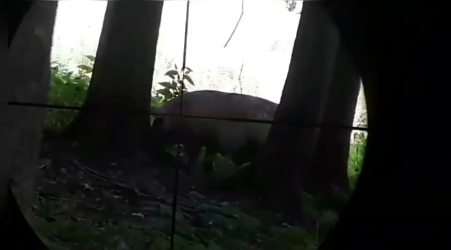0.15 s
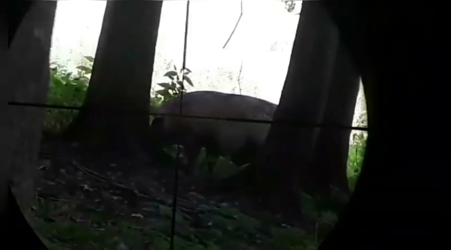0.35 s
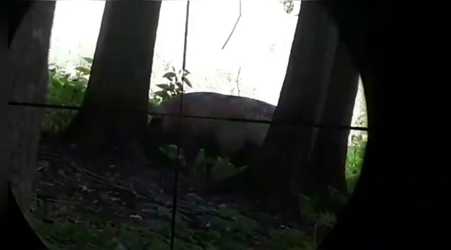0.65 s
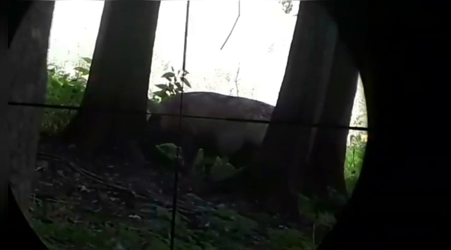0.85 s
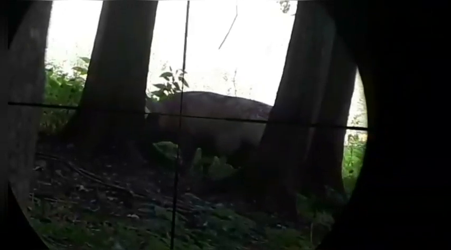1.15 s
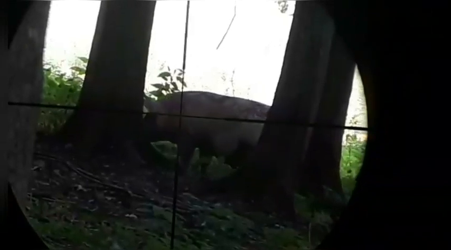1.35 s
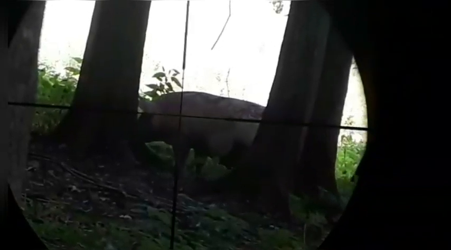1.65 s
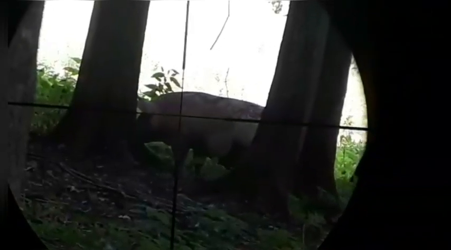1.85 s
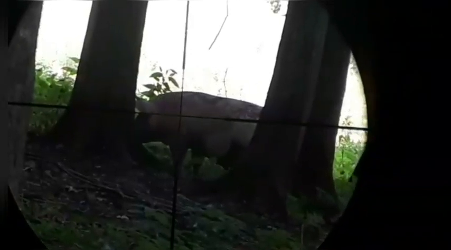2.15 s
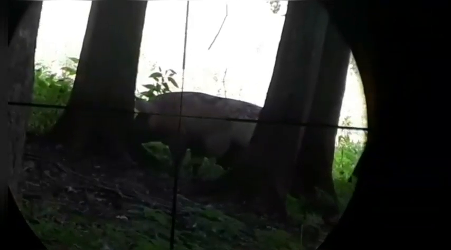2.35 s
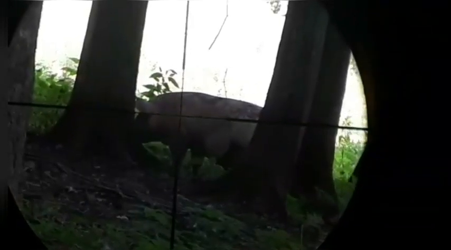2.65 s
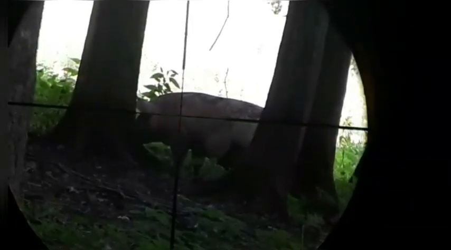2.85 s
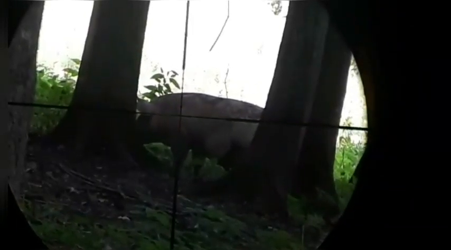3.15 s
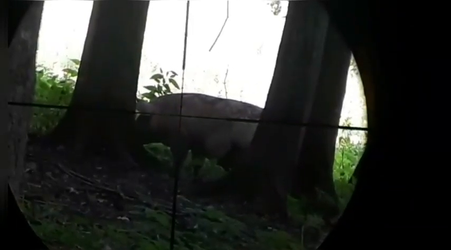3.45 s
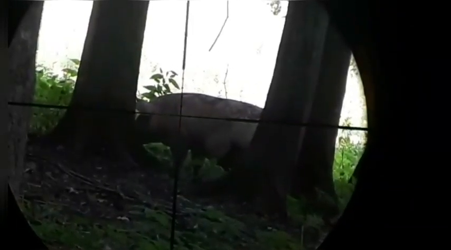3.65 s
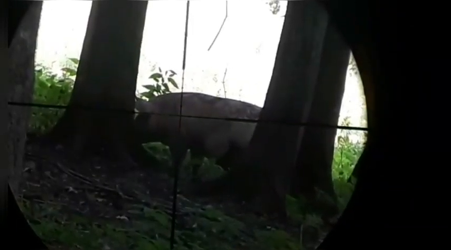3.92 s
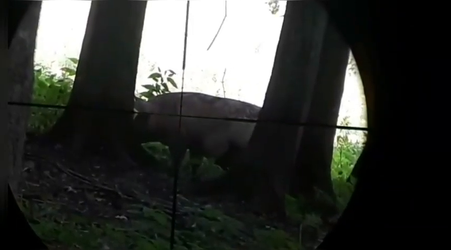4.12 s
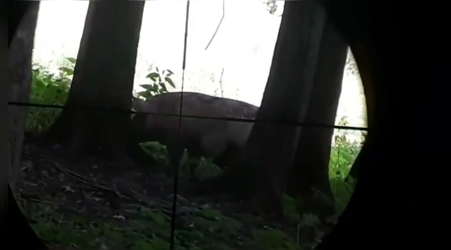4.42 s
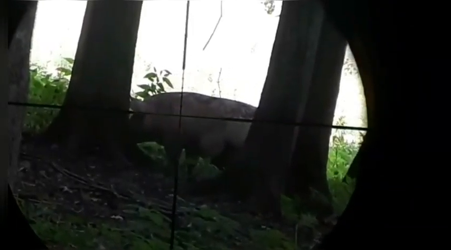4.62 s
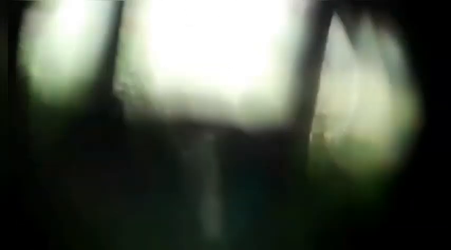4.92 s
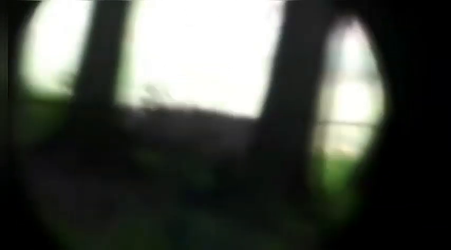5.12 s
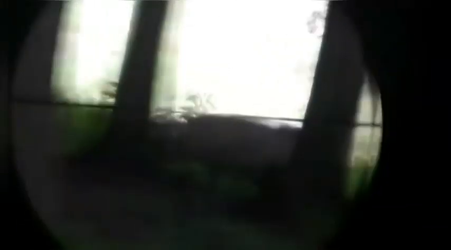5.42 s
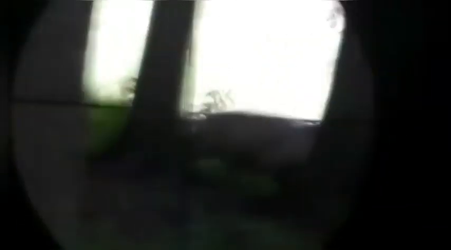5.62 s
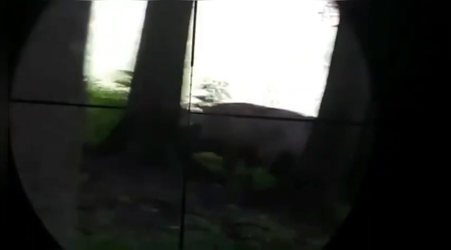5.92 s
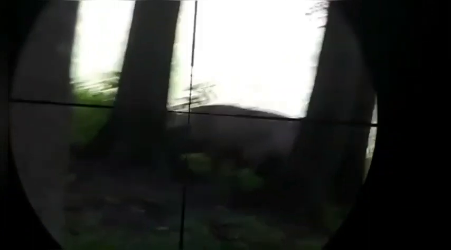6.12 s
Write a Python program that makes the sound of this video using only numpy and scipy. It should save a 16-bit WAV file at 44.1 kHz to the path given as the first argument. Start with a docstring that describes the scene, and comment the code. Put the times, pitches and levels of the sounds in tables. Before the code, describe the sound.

Faint insects and low rumble, small repeated creaks, a safety click and trigger clunk, then a violent stuttering crossbow blast that rings away.

```python
"""A crossbow is shot in a wood, played in slow motion: small creaks, a safety click, the trigger, then the release.
Struck modes make the creaks, clicks and blows; shaped noise is the rushing string, insects, rumble and echo.
The slowing keeps the pitch by playing short overlapping stretches of sound again and again, so each sound stutters.
Times are at true speed unless marked."""
import sys
import numpy as np
from scipy import signal
from scipy.fft import rfft, irfft
from scipy.io import wavfile
from scipy.ndimage import uniform_filter1d

SR = 44100
rng = np.random.default_rng(int(sys.argv[2]) if len(sys.argv) > 2 else 0)


def level_to_linear(level):
    """Convert decibel levels to linear amplitude factors, elementwise."""
    exponent = np.asarray(level, float) / 20
    return 10 ** exponent


def transcribe(signal):
    """Save signal, clipped to [-1, 1], as a 16-bit WAV file at the path in sys.argv[1]."""
    frames = np.atleast_2d(signal).T
    limited = np.clip(frames, -1, 1)
    pcm = np.round(limited * 32767).astype(np.int16)
    wavfile.write(sys.argv[1], SR, pcm)


N = 276869  # samples of slowed sound
LENGTH = round(1.8 * SR)  # samples at true speed


def evened(x):
    """Power normalisation: scales to rms 1."""
    return x / np.sqrt(np.mean(x ** 2) + 1e-20)


def read(points, hz):
    """Interpolation along log frequency, in which hearing is roughly even."""
    f, value = np.transpose(points)
    return np.interp(np.log(hz + 1), np.log(f + 1), value)


def add(mix, s, sound):
    """Superposition: adds a two-channel sound in at s."""
    part = mix[:, round(s * SR):][:, :sound.shape[1]]
    part += sound[:, :part.shape[1]]


def sides(db):
    """Level panning: left and right gains for a level difference."""
    return level_to_linear(np.array([db, -db]) / 2)


def noise(spectrum, same, size):
    """Partial coherence: two channels of coloured noise share a part of their spectrum."""
    hz = np.fft.rfftfreq(size, 1 / SR)
    left, other = rfft(rng.standard_normal((2, size)))
    likeness = np.clip(read(same, hz), 0, 1)
    right = likeness * left + np.sqrt(1 - likeness ** 2) * other
    return evened(irfft(np.array([left, right]) * level_to_linear(read(spectrum, hz)), size))


def ring(modes, split_hz, gains_db, scatter_db, contact):
    """Modal synthesis of one blow: decaying sines driven by a push; a longer contact (s) dulls it.
    The groups of modes between the split_hz get own peak levels before the channels are panned.
    Each mode has a chance strength that differs between the two ports."""
    hz, db, t60 = np.transpose(modes)[:, :, None]
    t = np.arange(round(.3 * SR)) / SR
    chance = rng.standard_normal((3, len(modes)))
    strength = level_to_linear(scatter_db * (chance[0] + 0.49 * chance[1:]))
    shapes = level_to_linear(db - 60 * t / t60) * np.sin(2 * np.pi * hz * t)
    push = np.sin(np.pi * np.minimum(t[:200] / contact, 1)) ** 2
    group = np.digitize(hz[:, 0], split_hz)
    out = 0
    for k, gain_db in enumerate(gains_db):
        sound = (strength * (group == k)) @ shapes
        sound = signal.lfilter(np.diff(push), 1, sound)  # sound radiates from the change of the push
        out = out + level_to_linear(gain_db) * sound / abs(sound).max()
    return out


# colour of the rumble, air and insects: hz [Hz], relative_level_db [dB]
WOOD_COLOUR = [(20, -36), (50, -14.5), (75, -11), (96, 2.5), (123, -9), (154, -9), (210, -18.5), (260, -23),
               (400, -30), (600, -33.5), (2000, -39), (4300, -40), (4800, -30), (5200, -23), (5800, -32.5),
               (6800, -21), (7600, -28), (8800, -42.5), (16000, -45)]
# coherence of the two channels: hz [Hz], likeness [0 to 1]
WOOD_LIKENESS = [(60, 0.67), (180, 1), (550, 0.38), (1650, 0.27), (4970, 0.78), (15000, 0.92)]
# faint thin tones that swell and fade: middle_s [s], length_s [s], pitch_hz [Hz], level_db [dB before wavering]
THIN_TONES = [(.08, 0.21, 527, -76), (0.934, 0.0026, 2470, -61), (1.232, .006, 1550, -61),
              (1.25, .03, 3690, -75), (1.215, .03, 500, -55), (1.22, .03, 1190, -65.5)]


def wood():
    """Filtered noise, gently swelling, for rumble, faint air and two bands of insects; modulated sines for tones."""
    t = np.arange(LENGTH) / SR
    swell, waver = (evened(uniform_filter1d(v, size=3000)) for v in rng.standard_normal((2, LENGTH)))
    tones = 0
    for middle_s, length_s, pitch_hz, level_db in THIN_TONES:
        envelope = level_to_linear(level_db + 2.5 * waver) * np.exp(-((t - middle_s) / length_s) ** 2)
        tones = tones + envelope * np.sin(2 * np.pi * pitch_hz * t + 1.6 * swell)
    air = level_to_linear(-60.5) * noise(WOOD_COLOUR, WOOD_LIKENESS, LENGTH)
    return air * level_to_linear(.6 * swell) + tones


# modes of the grip: pitch_hz [Hz], relative_level_db [dB], t60_s [s]
GRIP_MODES = [(500, 10.5, 0.011), (956, -1, 0.026), (1410, 4, 0.017), (1940, 4, 0.024), (2480, 12, 0.0056),
              (2983, 4.5, 0.01), (3400, -5, 0.016), (3900, -23, 0.0087), (4700, 9, 0.004),
              (6230, 9, 0.0033), (11500, 1, 0.0033)]
# creaks of a strap or grip, each a quick run of slips:
# middle_s [s], length_s [s], level_db [dB], bass_db [dB re level], treble_db [dB re level]
CREAK_RUNS = [(.067, 0.0046, -35, -43, -2.5), (0.2089, .006, -36.5, -12.5, -21),
              (.349, .006, -44.5, -15.5, -11)]


def creaks():
    """Stick-slip friction: each slip rings the grip briefly; slips swell to the middle of a creak and fade."""
    count, reach = 9, 1.6  # slips are spread over about reach lengths each side of the middle
    upper_hz = 1600  # the upper modes radiate little below this
    thin = signal.butter(3, upper_hz, "high", fs=SR, output="sos")
    low = [mode for mode in GRIP_MODES if mode[0] < upper_hz]
    high = GRIP_MODES[len(low):]
    out = []
    for middle_s, length_s, level_db, bass_db, treble_db in CREAK_RUNS:
        place = np.linspace(-1, 1, count) + rng.uniform(-0.9, 1, count) / count
        for u, (size, side) in zip(reach * place, rng.standard_normal((count, 2))):
            slip_db = level_db - 5.4 * u ** 2 + 3 * size
            sound = signal.sosfilt(thin, ring(high, [4500], (slip_db, slip_db + treble_db), 6.2, 0.00013))
            sound = sound + ring(low, [], [slip_db + bass_db], 4.7, 0.00036)
            out.append((middle_s + u * length_s, sides(5 * side)[:, None] * sound))
    return out


# modes of the trigger housing: pitch_hz [Hz], relative_level_db [dB], t60_s [s]
HOUSING_MODES = [(278, 0.5, 0.054), (383, -18, 0.07), (492, -11, 0.029), (655, -20, 0.035), (936, 5, 0.02),
                 (1174, 9, 0.014), (1280, -17.5, 0.12), (1290, -19.5, 0.082), (1522, 11, 0.02),
                 (1840, 7, 0.017), (2110, -27, 0.02), (2930, -25, 0.013)]
# latch and trigger moving:
# start_s [s], thud_db [dB before the scrape], snap_db [dB before the scrape], length_s [s], left_right_db [dB]
LATCH_MOVES = [(0.884, -36, -28.5, 0.0054, -5), (0.932, -54, -58, 0.0012, -2),
               (1.182, -30.5, -32, 0.0063, -6), (1.195, -36, -66.5, 0.045, -6),
               (1.235, -40, -81, .02, -4.5), (1.265, -48, -63.5, .02, -10.5), (1.282, -36, -47, .008, -9)]


def latch():
    """Source-filter principle: a short scrape that swells and dies drives the modes of the trigger housing."""
    t = np.arange(1500) / SR
    out = []
    for start_s, thud_db, snap_db, length_s, left_right_db in LATCH_MOVES:
        envelope = np.exp(-(t / length_s) ** 2) * (1 - np.exp(-t / 0.013))
        scrape = rng.standard_normal(len(t)) * envelope
        scrape /= np.linalg.norm(scrape)
        blow = ring(HOUSING_MODES, [750], (thud_db, snap_db), 0.5, 0.00057)
        sound = signal.fftconvolve(blow, scrape[None], axes=1)
        out.append((start_s, sides(left_right_db)[:, None] * sound))
    return out


# bright and dull colours of the rush: hz [Hz], relative_level_db [dB per Hz]
BRIGHT_COLOUR = [(40, -34), (100, 3), (250, -4), (600, -3), (825, -3.5), (1290, -2), (2100, -7.5),
                 (2600, -9), (3100, -16), (6000, -19), (9400, -24.5), (13200, -23), (14700, -24),
                 (16000, -34.5)]
DULL_COLOUR = [(40, -67.5), (100, -37), (200, -3), (277, 6.5), (360, -18.5), (472, -1), (558, -19),
               (800, -28.5), (1610, -18), (4200, -24.5), (6000, -37), (9000, -56), (16000, -81.5)]
# coherence of the bow's noise, for rush and ticks: hz [Hz], likeness [0 to 1]
BOW_LIKENESS = [(60, .8), (500, .84), (1650, .88), (3500, .5), (6000, .3), (15000, .3)]


def rush():
    """Friction noise: the string scrapes the bolt along the rail, then a dying shudder.
    The noise turns from bright to dull and is lumpy like many small knocks."""
    t = np.arange(LENGTH) / SR - 1.2885
    after = np.maximum(t - .033, 0)  # s since the scrape began to die
    level = np.hypot(level_to_linear(-9 - 420.5 * after), level_to_linear(-19 - 124 * after))  # scrape and shudder, falls in dB/s
    level = level * level_to_linear(6002.5 * np.minimum(t, 0))  # steep rise, dB/s
    dull = 0.2 + (0.99 - 0.2) * np.minimum(after / 0.019, 1)  # share of the power
    lumps = evened(uniform_filter1d(rng.standard_normal(LENGTH), size=60))
    bright_part = np.sqrt(1 - dull) * noise(BRIGHT_COLOUR, BOW_LIKENESS, LENGTH)
    dull_part = np.sqrt(dull) * noise(DULL_COLOUR, BOW_LIKENESS, LENGTH)
    return level * level_to_linear(4.13 * lumps) * (bright_part + dull_part)


RELEASE_S = 1.289
# recoil felt by the microphone: level_db [dB in the shot], start_pitch_hz [Hz], t60_s [s]
RECOIL = (-23, 111, 0.01)
# slow lurch of the whole bow: level_db [dB in the shot], pitch_hz [Hz], t60_s [s]
LURCH = (-30, 34, .05)


def kick():
    """Damped oscillation: a few slow swings of the whole bow, the recoil falling in pitch."""
    t = np.arange(round(.5 * SR)) / SR
    level_db, pitch_hz, t60_s = RECOIL
    cycles = pitch_hz * t * (1 - 4.5 * np.minimum(t, .1))
    recoil = level_to_linear(level_db - 60 * np.maximum(t - .04, 0) / t60_s) * np.sin(2 * np.pi * cycles)
    level_db, pitch_hz, t60_s = LURCH
    lurch = level_to_linear(level_db - 60 * np.maximum(t - .045, 0) / t60_s) * np.sin(2 * np.pi * pitch_hz * t)
    return np.tile(recoil + lurch * np.minimum(t / 0.015, 1), (2, 1))


# limb modes set ringing by the release: pitch_hz [Hz]
LIMB_PITCHES = [272, 362, 540, 635]
# their decay, in the same order: level_db [dB in the shot], t60_s [s]
LIMB_DECAYS = [(-22.5, 0.5), (-20, 0.74), (-37, 0.66), (-37, .45)]


def limb_ring():
    """Free vibration: the limbs ring on in decaying sines, a little out of phase between the ports."""
    t = np.arange(round(.5 * SR)) / SR
    lag = np.array([[0], [.08]])  # cycles
    out = 0
    for pitch_hz, (level_db, t60_s) in zip(LIMB_PITCHES, LIMB_DECAYS):
        wave = np.sin(2 * np.pi * (pitch_hz * t + rng.random() + lag))
        out = out + level_to_linear(level_db - 60 * t / t60_s) * wave
    return out * np.minimum(t / 0.021, 1)


# the string slapping the rail, bright: start_s [s], level_db [dB, relative]
STRING_SLAPS = [(1.3094, 5), (1.3187, 2), (1.3393, -10), (1.3575, -1.5), (1.3646, -13), (1.3726, -6),
                (1.3864, 0.5), (1.4022, -11.5), (1.4685, -17.5), (1.4875, -30)]
# the string knocking the stock, dull: start_s [s], thud_db [dB, relative], snap_db [dB, relative]
STOCK_KNOCKS = [(1.345, -0.5, -3.5), (1.3498, -15.5, -6), (1.373, -6.5, -21), (1.4083, -10, -11.5),
                (1.415, -19, -22), (1.4234, -17.5, -6), (1.3925, -20.5, -23), (1.4356, -28, -36),
                (1.444, -16, -24), (1.4553, -19, -21), (1.462, -49, -23), (1.4901, -19.5, -18.5),
                (1.5239, -26, -28), (1.5421, -44, -34.5), (1.5594, -29.5, -37.5)]


def strikes():
    """Impact sequence: slaps, knocks and a chance, fading rattle as (s, thud dB, snap dB, tick dB)."""
    knock_tick_db = -21  # re snap
    rows = [(s, db - 15.5, db - 9, db) for s, db in STRING_SLAPS]
    rows += [(s, thud_db, snap_db, snap_db + knock_tick_db) for s, thud_db, snap_db in STOCK_KNOCKS]
    start, end, count = 1.32, 1.62, 16  # small knocks by chance
    for s, size in zip(rng.uniform(start, end, count), rng.standard_normal(count)):
        thud_db = -15 - 128.5 * (s - start) + 5.5 * size
        snap_db = thud_db - 1
        rows.append((s, thud_db, snap_db, snap_db + knock_tick_db))
    return rows


# modes of the stock: pitch_hz [Hz], relative_level_db [dB], t60_s [s]
STOCK_MODES = [(181, 7, 0.019), (272, 6.5, 0.038), (408, -4.5, 0.041), (524, -5.5, 0.025),
               (621, -10.5, 0.042), (757, 12.5, 0.0047), (954, -24.5, 0.043), (1320, -4.5, 0.021),
               (1550, -5.5, 0.0022), (1920, 6, 0.0025), (2360, 6.5, 0.0037), (2480, -17.5, 0.0056),
               (3180, -19, 0.0019)]
# colour of the tick: hz [Hz], relative_level_db [dB]
TICK_COLOUR = [(2000, -34), (3500, 9.5), (5000, 2), (7500, 1.5), (10000, -5.5), (13000, -9.5), (14800, -5),
               (16000, -13)]


def slaps():
    """Impact excitation: each strike thuds and snaps in the stock and leaves a bright tick; weak ones touch longer."""
    t = np.arange(1024) / SR
    tick_fade = np.exp(-t / 0.00094) + 0.086 * np.exp(-t / 0.007)
    out = []
    for s, thud_db, snap_db, tick_db in strikes():
        tick = noise(TICK_COLOUR, BOW_LIKENESS, len(t)) * tick_fade
        out.append((s, level_to_linear(tick_db - 9.5) * tick))
        contact = 0.00031 * level_to_linear(-.3 * snap_db)
        blow = -ring(STOCK_MODES, [750], (thud_db + 4, snap_db), 7.4, contact)
        out.append((s - contact / 2, blow))
    return out


def echoed(x):
    """Diffuse reflection: adds the scattered return of the nearby trunks, different at each port."""
    t = np.arange(round(.5 * SR)) / SR
    tail = rng.standard_normal((2, len(t))) * level_to_linear(-60 * t / 0.2) * (t > 0.0066)  # t60 and delay, s
    tail = signal.sosfilt(signal.butter(1, (500, 7000), "band", fs=SR, output="sos"), tail)
    return x + level_to_linear(-20.5) * signal.fftconvolve(x, tail / np.linalg.norm(tail[0]), axes=1)[:, :LENGTH]


def ducked(x):
    """Dynamic range compression at true speed: gain falls at once with a loud sound, recovers slowly."""
    threshold_db, share, recover_db_per_s = -29.5, 0.28, 2  # share of the excess removed
    power_db = 10 * np.log10(abs(uniform_filter1d((x ** 2).mean(0), size=200)) + 1e-12)
    fall = np.arange(LENGTH) * recover_db_per_s / SR
    cut_db = share * np.maximum(power_db - threshold_db, 0)
    held_db = np.maximum.accumulate(cut_db + fall) - fall
    return x / level_to_linear(np.maximum(held_db, 0))


# start of a piece off the even pace, for runs of pieces that carry clicks or the shot:
# first_piece [count], offsets_ms [list of ms, one per piece]
PIECE_OFFSETS = [(0, [0, -6.3, 6.2, -10.2, 8.2, -5.3, -2.8, 3.5, -9.6, 8.9, 2.3, 5.4]),
                 (25, [-9.8, 2.7, -4.9, -11, 10.5, 2.1]),
                 (35, [4.8, .5, -3.4, 4.6, .4, 2, 2.7, -8.2, 6.5, 9.8, -3, 4, -6.2, 1.4, -.5, 1, -8.8, .8])]


def slowed(x):
    """Overlap-add time stretching: each piece plays at true speed until the next, from further back, fades in.
    A piece that PIECE_OFFSETS does not list starts where it best continues the wave of the one before."""
    first_s, piece_s, slowing, fade_s = .02464, .119165, 4, .0075  # a piece starts every piece_s slowed s
    size, reach = round(.02 * SR), round(.011 * SR)  # matched stretch, search each way
    listed = {first + k: ms / 1000 for first, run in PIECE_OFFSETS for k, ms in enumerate(run)}
    t, mid = np.arange(N) / SR, x.mean(0)
    out = x[:, np.minimum(np.arange(N) + round(piece_s * (1 - 1 / slowing) * SR), LENGTH - 1)]
    for k, s in enumerate(np.arange(first_s, N / SR, piece_s)):
        even = round((first_s + k * piece_s / slowing) * SR)
        if k in listed:
            source = even + round(listed[k] * SR)
        else:
            going = mid[source + round(piece_s * SR):][:size]
            nearby = mid[even - reach:even + reach + size]
            source = even - reach + np.argmax(np.correlate(nearby, going))
        on = slice(round((s - fade_s) * SR), round((s + piece_s + fade_s) * SR))
        share = np.clip((t[on] - s) / fade_s + .5, 0, 1)
        piece = x[:, np.arange(N)[on] + source - round(s * SR)]
        out[:, on] = (1 - share) * out[:, on] + share * piece
    return out


# level difference of the shot between the ports: hz [Hz], left_right_db [dB]
BOW_SIDE = [(30, -8.5), (60, -9), (180, -4), (550, -6), (1650, -3), (4970, -1.5), (15000, -1)]


def scene():
    """Superposition of the sources, the bow nearer the right port; all is then slowed."""
    shot, struck, small = np.zeros((2, LENGTH)), rush(), np.zeros((2, LENGTH))
    for s, sound in creaks() + latch():
        add(small, s, sound)
    add(shot, RELEASE_S, kick() + limb_ring())
    for s, sound in slaps():
        add(struck, s, sound)
    # the strikes and the rush are kept above 120 Hz
    shot = shot + signal.sosfilt(signal.butter(3, 120, "high", fs=SR, output="sos"), struck)
    shot = irfft(rfft(shot) * sides(read(BOW_SIDE, np.fft.rfftfreq(LENGTH, 1 / SR))), LENGTH)
    heard = ducked(wood() + echoed(small + level_to_linear(8.0) * shot))
    return slowed(1.32 * np.tanh(heard / 1.242))  # the microphone overloads on the release


def band_limit(x):
    """A steep low-pass at the top of the band."""
    return signal.sosfilt(signal.butter(12, 16270, fs=SR, output="sos"), x)


def record(dry):
    """Band limiting: the microphone passes 22 Hz to 16 kHz and clips at full scale."""
    band = signal.sosfilt(signal.butter(2, 22, "high", fs=SR, output="sos"), dry)
    band = signal.sosfiltfilt(signal.butter(12, 16000, fs=SR, output="sos"), band)
    return band_limit(np.clip(band, -1, 1))


dry = scene()
out = record(dry)
transcribe(out)
```